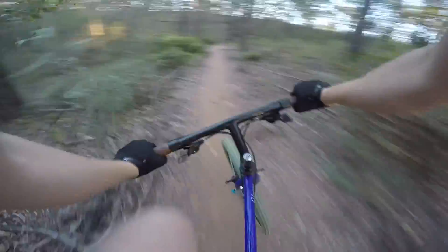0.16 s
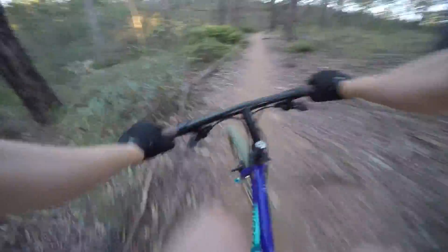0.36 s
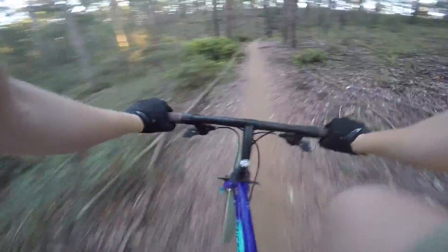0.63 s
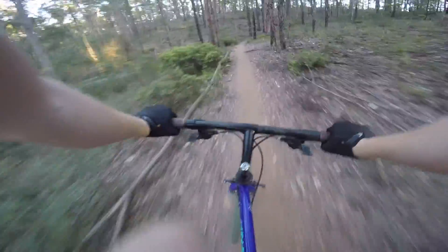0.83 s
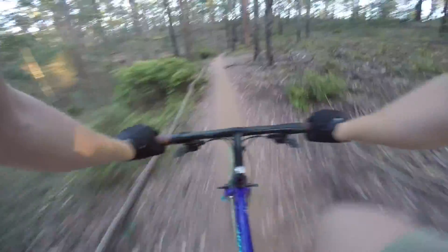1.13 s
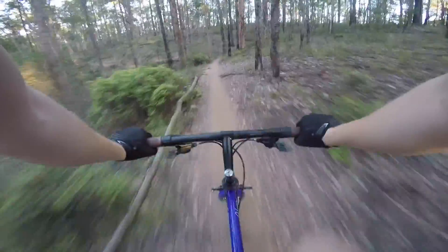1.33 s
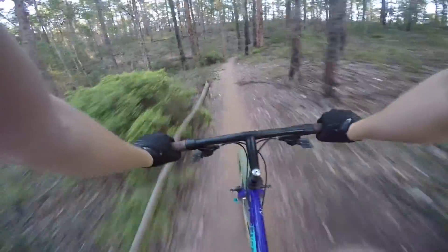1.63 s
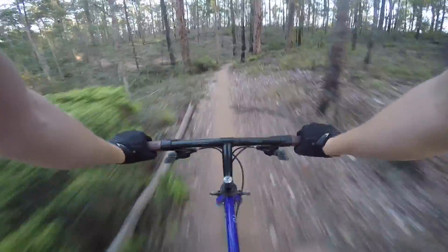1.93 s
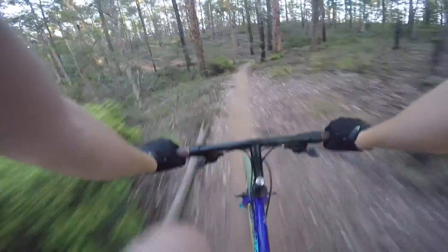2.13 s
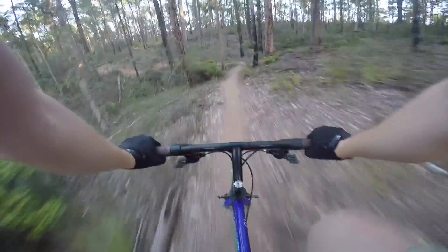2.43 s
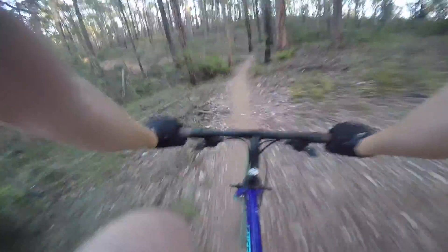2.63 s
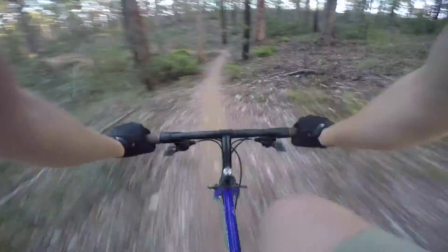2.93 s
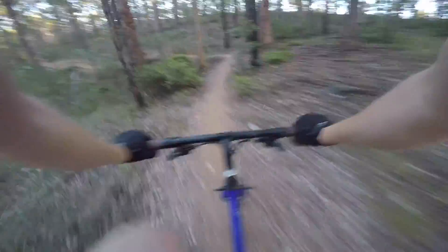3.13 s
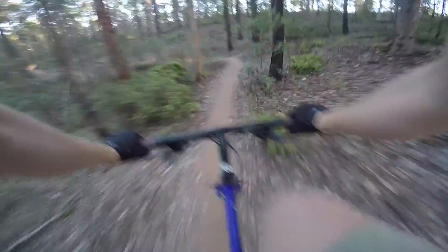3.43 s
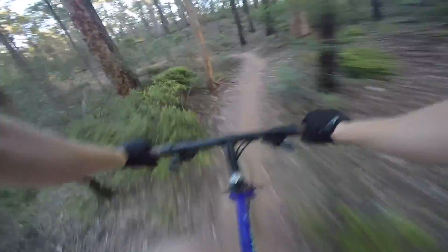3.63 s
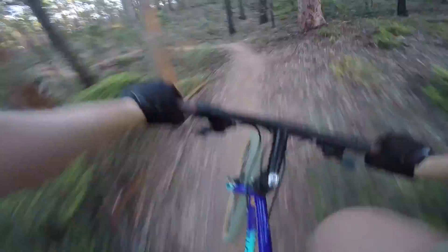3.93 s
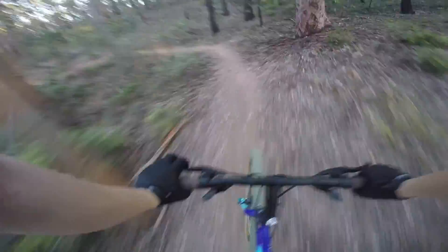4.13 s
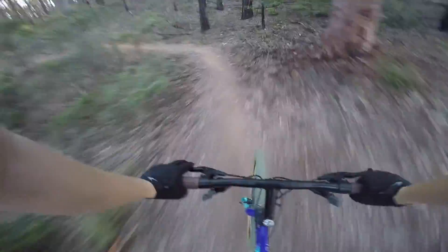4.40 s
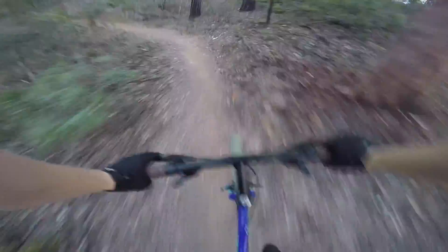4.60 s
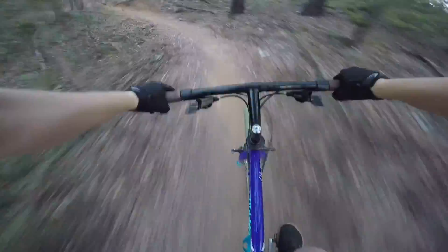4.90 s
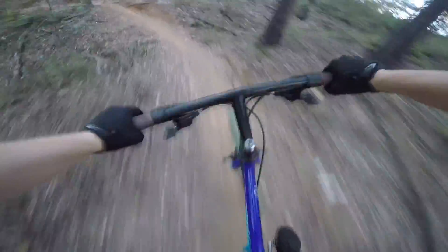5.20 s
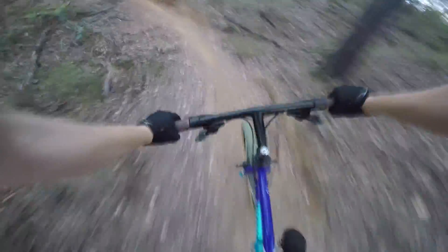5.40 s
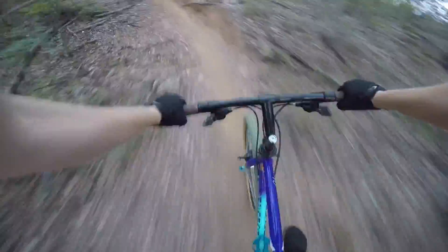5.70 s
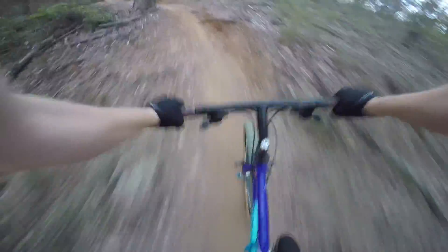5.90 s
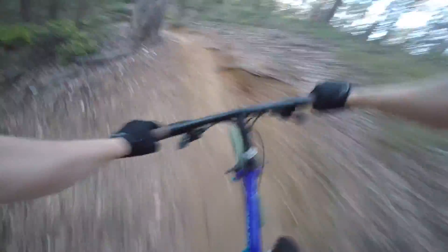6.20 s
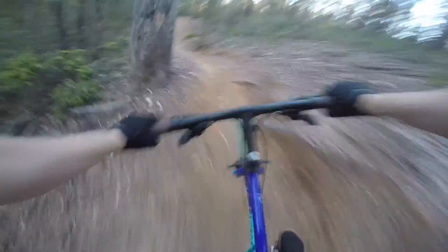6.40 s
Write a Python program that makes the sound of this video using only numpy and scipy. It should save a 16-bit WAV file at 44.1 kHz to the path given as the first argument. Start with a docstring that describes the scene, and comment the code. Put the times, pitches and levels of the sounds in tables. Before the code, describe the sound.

Close on the rider's chest, a cased camera hears knobby tyres crunch over a dry forest trail. Stones click and snap against a low, shaking rumble and a regular soft thump like a racing heartbeat. Hollow mount knocks begin after a second, chain links tick, and the crunch grows heavier past halfway. Near the end a hard hit makes metal ring briefly. Faint hiss and a thin high whine persist.

```python
"""A mountain bike runs fast down a dirt and gravel trail, heard from a cased camera on the rider's chest.
From the start filtered impulses crunch as gravel, decaying sines and noise flick as stones and tick as
chain, and wandering low tones rumble under an even thump of short pulses, likely a racing heartbeat.
After a second the camera mount begins to knock, as damped modes; past halfway the crunch grows heavier.
Near the end one hard hit sets a metal part ringing in many modes. Hiss and a thin whine run throughout."""
import sys
import numpy as np
from scipy import signal
from scipy.fft import rfft, irfft
from scipy.io import wavfile
from scipy.ndimage import map_coordinates

SR = 44100
rng = np.random.default_rng(int(sys.argv[2]) if len(sys.argv) > 2 else 0)


def master(y):
    """Save y as 16-bit WAV."""
    cut = np.clip(np.atleast_2d(y).T, -1, 1)
    pcm = np.round(cut * 32767)  # scale
    wavfile.write(sys.argv[1], SR, pcm.astype(np.int16))


N = 288846
T = np.arange(N) / SR


def undb(db):
    """Level in decibels to amplitude ratio."""
    return 10 ** (np.asarray(db) / 20)


def unit(x):
    """Normalisation to an rms of one."""
    return x / np.sqrt(np.mean(x ** 2))


def crest(x):
    """Normalisation to a peak of one."""
    return x / np.abs(x).max()


def curves(table):
    """Linear interpolation: each column of a table as a line through time."""
    s, *columns = np.transpose(table)
    return [np.interp(T, s, c) for c in columns]


def add(track, s, sound):
    """Superposition: mix a sound into a track at time s."""
    i = max(int(s * SR), 0)
    track[i:i + len(sound)] += sound[:max(N - i, 0)]


def colour(x, points, peaks=(), size=32768):
    """Minimum-phase filtering by a smooth spectrum plus resonances."""
    f = np.maximum(np.fft.rfftfreq(size, 1 / SR), 1)
    hz, db = np.transpose(points)
    db = np.interp(np.log(f), np.log(hz), db)
    for centre, width, height in peaks:
        db = db + height / (1 + (2 * (f - centre) / width) ** 4)
    # folding the cepstrum onto positive time makes the response causal
    cepstrum = irfft(np.log(undb(db)))
    cepstrum[1:size // 2] *= 2
    cepstrum[size // 2 + 1:] = 0
    response = irfft(np.exp(rfft(cepstrum)))
    return signal.fftconvolve(x, response)[:len(x)]


def noise(points, peaks=()):
    """Spectral shaping: coloured noise of rms one."""
    return unit(colour(rng.standard_normal(N), points, peaks))


def walk(rate):
    """Random modulation: lines joining `rate` random values a second, with an rms of one."""
    steps = rng.standard_normal(N // 20)
    return unit(map_coordinates(steps, [T * rate], order=1, mode="wrap"))


def fade(t60, size=8192):
    """Exponential decay by 60 dB in t60 seconds."""
    return np.exp(-np.log(1000) * T[:size] / max(t60, 1e-4))


def ring(hz, t60, size=8192):
    """Damped vibration of one struck mode."""
    return fade(t60, size) * np.sin(2 * np.pi * hz * T[:size])


def burst(t60, size=8192):
    """Broadband contact: an exponentially dying puff of noise."""
    return fade(t60, size) * rng.standard_normal(size)


def swell(s, length):
    """Gaussian envelope: a smooth rise and fall around time s."""
    return np.exp(-((T - s) / length) ** 2)


# spectrum of the hiss: (frequency [Hz], relative level [dB])
HISS_SPECTRUM = [(200, 0), (3000, -2.5), (8000, -10.5), (13000, -13.5), (16000, -17)]
WHINE_HZ = 12617.4


def electronics():
    """Stationary noise and pure tone: faint hiss, a steady whine and a blurred tone an octave below."""
    hiss = undb(-65.5) * noise(HISS_SPECTRUM)
    whine = undb(-71.5) * unit(np.sin(2 * np.pi * WHINE_HZ * T))
    blurred = undb(-74.0) * unit(walk(70) * np.sin(np.pi * WHINE_HZ * T))
    return hiss + whine + blurred


# roughness of the ride, which drives sway, buffeting and tread hum: (time [s], gain [dB])
RIDE_ROUGHNESS = [(0, 0), (.6, -5), (2.4, -4), (2.9, 0), (3.9, -2.5), (4.2, -3.5), (5.1, 1.5), (5.9, 3),
                  (6.55, 1)]
# bumps that swing the camera: (time [s], sway level [dB], air level [dB], time to fall to 1/e [s])
BUMP_SWELLS = [(0.129, -14.5, -54, 0.026), (.21, -13.5, -51, 0.043), (0.486, -13.5, -49, 0.022),
               (0.83, -22, -58, 0.049), (1.137, -21, -46, .035), (2.692, -11.5, -40, 0.048),
               (2.921, -11.5, -49, 0.082), (3.079, -20.5, -50, 0.039), (3.255, -13, -53, 0.039),
               (3.437, -18, -34, 0.014), (3.548, -19.5, -31.5, 0.024), (3.825, -12, -25.5, 0.037),
               (4.017, -17, -36, 0.051), (4.117, -47, -31, 0.046), (4.418, -19, -38.5, 0.043),
               (4.63, -17, -42, 0.052), (4.781, -18.5, -29, 0.03), (4.902, -15.5, -36, 0.053),
               (5.033, -14.5, -42, 0.058), (5.233, -17, -53, 0.027), (5.383, -14.5, -40, 0.064),
               (5.548, -16.5, -42, 0.067), (5.713, -18, -43, 0.099), (5.834, -18.5, -53, 0.023),
               (5.964, -10, -25.5, 0.039), (6.158, -13, -38, 0.083), (6.282, -11.5, -25, 0.027),
               (6.534, -16.5, -33, 0.1)]
# spectrum of the irregular jiggle: (frequency [Hz], relative level [dB])
SWAY_SPECTRUM = [(4, -25.5), (12, 2.5), (18, -1.5), (23, -6), (32, -4), (50, -7.5), (90, -32), (300, -84),
                 (2000, -130)]
# spectrum of the air on the case: (frequency [Hz], relative level [dB])
BUFFET_SPECTRUM = [(15, -4.5), (40, -3.5), (70, -1), (110, -12.5), (170, -19.5), (260, -35.5), (1500, -80),
                   (6000, -110)]
SWAY_DB, BUFFET_DB = -25.5, -39  # before the gain of the ride
SWAY_WANDER_DB = 2
SWAY_HZ, SWAY_DRIFT_OCTAVES = 20.7, 0.32  # centre and wander of the swing
SWAY_FLUTTER = 0.44  # amplitude of the jiggle re the swing


def rumble():
    """Frequency-modulated swing of the camera on its harness, with air buffeting; bumps swell both."""
    ride = undb(curves(RIDE_ROUGHNESS)[0])
    steady_sway = undb(SWAY_DB + SWAY_WANDER_DB * walk(8)) * ride
    bump_sway = sum(undb(db) * swell(s, length) for s, db, _, length in BUMP_SWELLS)
    bump_air = sum(undb(db) * swell(s, length) for s, _, db, length in BUMP_SWELLS)
    sway_size = np.hypot(steady_sway, bump_sway)
    air_size = np.hypot(undb(BUFFET_DB) * ride, bump_air)
    swing_hz = SWAY_HZ * 2 ** (SWAY_DRIFT_OCTAVES * walk(25))
    swing = np.sin(2 * np.pi * np.cumsum(swing_hz) / SR)
    sway = unit(unit(swing) + SWAY_FLUTTER * noise(SWAY_SPECTRUM))
    buffet = noise(BUFFET_SPECTRUM) * unit(undb(3.6 * walk(20)))
    return sway * sway_size + buffet * air_size


# thumps passed on by the chest strap: (time [s], relative level [dB], pitch [Hz])
HEARTBEATS = [(0.289, -11, 51), (0.6258, -12, 42.4), (0.957, -15, 44.8), (1.2938, -12.5, 51.6),
              (1.6283, -13.5, 50), (1.9678, -13.5, 52.6), (2.302, -16, 49), (2.634, -15, 48.6),
              (2.9659, -15.5, 40.4), (3.2985, -15.5, 53), (3.6328, -14, 52), (3.9635, -17.5, 50.7),
              (4.2905, -13.5, 51), (4.6228, -8.5, 47), (4.951, -15, 54.3), (5.2845, -6.5, 37.7),
              (5.6079, -10.5, 47.3), (5.9358, -20.5, 56)]
SECOND_BEAT_S, SECOND_BEAT_DB, SECOND_BEAT_HZ = 0.1686, -21, 27  # the softer, deeper half of each beat
SHUDDER_DB, SHUDDER_HZ, SHUDDER_T60_S = -13.5, 71.4, 0.25  # the harness; level re the beat, mean-range pitch


def heartbeat():
    """Transmission by the chest strap: a dip between two swells, a harness shudder, a softer second beat."""
    out = np.zeros(N)
    lead = .1  # seconds before the centre of a pulse
    t = T[:8192] - lead

    def pulse(hz, cycles):
        """Wave packet: a cosine under a Gaussian envelope."""
        return np.exp(-(t * hz / cycles) ** 2) * np.cos(2 * np.pi * t * hz)

    for s, db, hz in HEARTBEATS:
        thump = pulse(hz, 0.63) + 0.13 * pulse(hz * 1.57, 0.66) + 0.023 * pulse(hz * 3.47, 1.0)
        add(out, s - lead, -undb(db) * thump)
        shudder = ring(SHUDDER_HZ * rng.uniform(0.86, 1.2), SHUDDER_T60_S) * (1 - fade(0.033))
        add(out, s, undb(db + SHUDDER_DB) * shudder)
        second = pulse(SECOND_BEAT_HZ, 0.71)
        add(out, s - lead + SECOND_BEAT_S, -undb(SECOND_BEAT_DB) * second)
    return out


# knocks of the camera mount:
# (time [s], relative level [dB], thud re the clack [dB], thud pitch [Hz], clack pitch [ratio])
MOUNT_KNOCKS = [(1.09, -36.5, 3, 126, 0.93), (2.039, -40.5, 6.5, 128, 1), (2.419, -46, -7, 120, 0.82),
                (2.68, -22.5, 2.5, 130, 0.99), (2.811, -26, 6, 108, 0.97), (3.171, -38.5, -14, 120, 0.93),
                (3.813, -24, 5.5, 113, 0.99), (3.93, -23.5, 4.5, 108, 1.01), (4.383, -35, -6, 121, 0.99),
                (4.602, -35, 3, 106, 1.02), (4.713, -32, 4.5, 118, 1.006), (5.723, -28, 1.5, 118, 0.95),
                (5.978, -21, 1, 116, 1.004), (6.213, -19.5, 5.5, 112, 0.97), (6.293, -29, 2.5, 110, 1.02),
                (6.436, -30, 6.5, 118, 0.95)]
# modes of the camera mount: (nominal frequency [Hz], relative level [dB], t60 [s])
MOUNT_MODES = [(337, -3, 0.0073), (462, -12.5, 0.034), (669, -13, 0.056), (926, -5, 0.038),
               (1150, -10.5, 0.016), (1338, 6.5, 0.015), (1630, 2, 0.011), (1916, 0, 0.013),
               (2510, 7, 0.0057)]
KNOCK_RISE_S = 0.0079  # t60 of the approach to full contact


def knocks():
    """Modal impact: over a bump the mount hits its stop with a hollow clack, a scuff and a low thud."""
    out = np.zeros(N)
    scuff_spectrum = [(200, 16.0), (500, 6.0), (1500, 20.0), (2600, 19.5), (3200, -4), (9000, -35)]
    for s, db, thud_db, thud_hz, pitch in MOUNT_KNOCKS:
        detune = pitch * (1 + 0.012 * rng.standard_normal(len(MOUNT_MODES)))
        clack = 0
        for k, ((hz, mode_db, t60), ratio) in enumerate(zip(MOUNT_MODES, detune)):
            clack = clack + undb(mode_db) * ring(hz * ratio, t60) * (-1) ** k  # alternating polarity
        scuff = colour(burst(0.05), scuff_spectrum, size=4096)
        knock = crest(clack * (1 - fade(KNOCK_RISE_S))) + .4 * crest(scuff)
        thud = -ring(thud_hz, 0.048) * (1 - fade(0.0064))
        add(out, s, undb(db + 3.0) * (knock + undb(thud_db) * thud))
    return out


# chain ticks: (time [s], relative level [dB], t60 [s])
CHAIN_TICKS = [(0.158, -44.5, 0.043), (0.401, -51, .03), (2.592, -48.5, .03), (3.448, -36.5, 0.045),
               (3.983, -45, .04), (3.99, -45, 0.046), (4.644, -43.5, 0.094), (4.947, -45.5, .02),
               (5.093, -49, .03), (5.2776, -39, 0.029), (5.291, -43, .03), (5.303, -42.5, 0.052),
               (5.34, -46, 0.048), (5.45, -44.5, 0.019), (5.468, -39.5, 0.026), (5.483, -44, 0.025),
               (5.543, -47, .025), (5.7284, -40.5, 0.021), (5.866, -47, .025), (6.0738, -33, 0.016),
               (6.23, -47, .04), (6.528, -38, 0.035)]
# spectrum of the slapping links: (frequency [Hz], relative level [dB])
LINK_SPECTRUM = [(1500, -42), (4000, -2), (6500, -0.5), (8000, -7.5), (11000, -12.5), (15000, -14)]
# resonances of the links: (nominal frequency [Hz], width [Hz], nominal height [dB])
LINK_RESONANCES = [(5650, 90, 6), (6730, 90, 11), (7250, 80, 5), (7700, 110, 8), (8080, 140, 6),
                   (8950, 400, 6), (12400, 500, 3), (14500, 400, -6)]
LINK_DETUNE, LINK_SPIKY_DB = 0.024, 2  # spread of pitch as a ratio; unevenness of the chatter


def chain():
    """Resonant filtering of contact noise: links tick brightly, each with a ring of its own."""
    out = np.zeros(N)
    for s, db, t60 in CHAIN_TICKS:
        chatter = undb(LINK_SPIKY_DB * rng.standard_normal(8192))
        slap = burst(t60) * (1 - fade(t60 / 4)) * chatter
        modes = []
        for hz, width, height in LINK_RESONANCES:
            link_hz = hz * (1 + LINK_DETUNE * rng.standard_normal())
            modes.append((link_hz, width, height * rng.uniform(.2, 1.4)))
        add(out, s, crest(colour(slap, LINK_SPECTRUM, modes, size=4096)) * undb(db + 5.0))
    return out


# hard hit on metal: (time [s], relative level [dB])
METAL_HITS = [(5.955, -10)]
# modes of the struck metal: (frequency [Hz], relative level [dB], t60 [s])
METAL_MODES = [(2268, -7, .5), (2286, -14, .25), (3591, -17, .33), (3720, -20, .28), (4102, -22, .4),
               (4646, -12, .13), (4705, 2, .06), (5334, -13, .08), (5701, -2.5, .26), (5728, -12, .17),
               (5800, -17, .2), (5975, -9, .07), (6070, -14, .17), (6567, -3, .13), (6798, -8, .07),
               (7560, -17, .08), (8450, -12, .05), (8950, -12, .06), (9650, -14, .05), (10440, -15, .05),
               (10620, -15, .04), (11300, -18, .04), (11880, -20, .05), (13100, -25, .04)]
METAL_BUZZ_DB = 2.5  # the ring trembles as it dies


def clang():
    """Modal synthesis: a brief clatter of contact, then the metal rings on."""
    out = np.zeros(N)
    crash_spectrum = [(2000, -11), (4500, 3), (5300, -2), (6800, 0), (7800, -7), (11000, -8),
                      (13000, -15), (15500, -24)]
    for s, db in METAL_HITS:
        modes = sum(undb(mode_db) * ring(hz, t60, size=32768) for hz, mode_db, t60 in METAL_MODES)
        clatter = burst(0.023) * (1 - fade(0.011))
        crash = colour(clatter, crash_spectrum, size=4096)
        tremble = undb(METAL_BUZZ_DB * walk(160)[:len(modes)])
        add(out, s, undb(db - 4) * crest(crash))
        add(out, s + .002, undb(db - 14.5) * modes * tremble)
    return out


# resonances of the camera case: (frequency [Hz], width [Hz], height [dB])
CASE_RESONANCES = [(350, 53, 7.5), (680, 18, 2), (1008, 40, 5.5), (1258, 182, 7.5), (1464, 90, -7.5),
                   (1701, 497, 8), (2360, 26, 3), (3203, 750, 5), (3130, 110, 3.5), (3320, 293, -5),
                   (3603, 92, 4), (4147, 100, 5.5), (4640, 390, 2), (4890, 280, -3.5), (5080, 150, -14),
                   (5780, 450, -3.5), (6770, 430, 3.5)]
STONE_T60_S, STONE_DIRT_DB = 0.0093, -3  # ring of a stone; dirt burst re the ring
STONE_RISE_S = 0.0015  # t60 of the approach to full contact


def stone(hz, bright_db):
    """Impact of a small body: a short pitched click, a crack and a scatter of dirt, with little low end."""
    click = ring(hz, STONE_T60_S) - 0.5 * ring(hz * 1.32, 0.01) + 0.66 * ring(hz * 1.666, 0.0077)
    snap = click + 0.95 * burst(0.014) + undb(STONE_DIRT_DB) * burst(0.037)
    tone = [(300, -31), (min(hz * 0.62, 1900), -13), (min(hz * 0.63, 3000), -5), (3600, bright_db / 2),
            (6000, bright_db - 12.5), (9000, bright_db - 27.5), (15000, bright_db - 51)]
    return crest(colour(snap * (1 - fade(STONE_RISE_S)), tone, CASE_RESONANCES, size=4096))


# how hard the tyres bite into the gravel: (time [s], relative crunch level [dB])
TRAIL_BITE = [(0.03, -45.5), (.13, -46.5), (.22, -50.5), (.36, -46), (.55, -43), (.68, -45.5), (.77, -47),
              (.86, -45), (1.0, -44.5), (1.07, -45.5), (1.15, -45.5), (1.3, -43.5), (1.5, -46), (1.68, -46),
              (1.95, -47), (2.25, -49), (2.42, -49), (2.56, -49.5), (2.72, -44), (2.95, -41), (3.04, -43),
              (3.17, -39), (3.33, -39.5), (3.6, -38.5), (3.72, -40.5), (3.85, -34.5), (3.91, -36.5),
              (3.97, -38), (4.04, -44.5), (4.12, -46), (4.29, -45.5), (4.35, -40.5), (4.43, -46.5),
              (4.69, -46.5), (4.8, -38), (4.9, -42), (5.04, -34.5), (5.25, -37), (5.43, -44.5),
              (5.55, -36.5), (5.66, -33.5), (5.82, -29.5), (5.89, -34), (5.94, -29.5), (6.04, -35.5),
              (6.12, -33.5), (6.28, -34), (6.42, -40.5), (6.495, -55), (6.515, -38.5)]
PEBBLES_PER_S, PEBBLE_DB, PEBBLE_SCATTER_DB = 11, 8, -1  # mean rate; peak re the bite curve; its spread
PEBBLE_HZ, PEBBLE_BRIGHT_DB = (1750, 2320), 1.5  # pitch range; middle brightness


def pebbles(count=200):
    """Random point process: small stones fly at uneven moments, louder where the tyres bite harder."""
    out = np.zeros(N)
    times = np.cumsum(rng.uniform(.1, 1.9, count)) / PEBBLES_PER_S
    pitches = rng.uniform(*PEBBLE_HZ, count)
    variations = rng.standard_normal((count, 2))
    for s, hz, (scatter, tint) in zip(times, pitches, variations):
        if s < T[-1]:
            bite_db = np.interp(s, *np.transpose(TRAIL_BITE))
            db = bite_db + PEBBLE_DB + PEBBLE_SCATTER_DB * min(scatter, 1.5)
            add(out, s, stone(hz, PEBBLE_BRIGHT_DB + 4 * min(tint, 1)) * undb(db))
    return out


# larger stones flicked by the tyres: (time [s], relative level [dB], pitch [Hz], brightness [dB])
FLICKED_STONES = [(0.263, -36, 1840, -3), (0.299, -36.5, 3200, 4), (0.363, -38, 2560, -8),
                  (0.404, -36, 2980, -19), (0.462, -34.5, 1770, -12), (0.5, -36, 1700, -7),
                  (0.519, -35, 1800, -16), (0.5577, -29.5, 1740, -15), (0.579, -31.5, 1680, -14),
                  (0.622, -31, 1920, 4), (0.661, -38, 1770, -6), (0.6929, -32, 1880, -4),
                  (0.709, -29, 1800, -2), (0.832, -30.5, 1820, 4), (0.886, -33, 1740, -6),
                  (0.968, -30, 1920, 2), (1.002, -28, 1830, 3), (1.02, -24, 1880, -3.5),
                  (1.1018, -25, 1660, 4), (1.2155, -25, 1810, -12), (1.2226, -26, 1850, -11),
                  (1.3007, -32.5, 1840, 12), (1.3952, -31, 3200, -20), (1.619, -37.5, 1800, -4),
                  (1.707, -32, 1730, 10), (1.728, -32, 1750, -6), (1.76, -25.5, 2340, -4),
                  (1.803, -32, 3040, -18), (1.852, -37, 3150, -6), (1.931, -25, 2240, -2),
                  (2.1057, -28, 2850, -13), (2.1137, -32.5, 1770, 4), (2.399, -38, 1790, 4),
                  (2.418, -34, 1695, -9), (2.6564, -23, 2960, -13), (2.691, -30, 1850, 14),
                  (2.721, -28.5, 1730, -24), (2.824, -34, 1790, -29), (2.872, -37, 1870, -1),
                  (2.951, -22.5, 2890, -4), (2.9823, -28.5, 2980, -16), (3.07, -35, 3300, 25),
                  (3.09, -31.5, 1670, -4), (3.1913, -30, 1750, -10), (3.265, -24, 1800, -5),
                  (3.335, -29, 2400, -11), (3.4098, -26.5, 1700, -3), (3.4552, -28, 1660, 9),
                  (3.536, -37, 3430, -11), (3.598, -29.5, 1670, -10), (3.676, -28.5, 1750, -3),
                  (3.699, -30, 3040, 6), (3.753, -23.5, 2690, -5), (3.795, -34, 1850, -19),
                  (3.8555, -22, 1920, -14), (3.957, -32, 1700, -15), (4.013, -27.5, 2010, -4),
                  (4.076, -32, 1910, 7), (4.093, -30, 1770, -7), (4.178, -39, 3500, -3),
                  (4.357, -32, 1530, 19), (4.368, -29, 1620, -8), (4.3836, -20, 2000, -11),
                  (4.496, -33.5, 2650, -5), (4.502, -28.5, 1950, -5), (4.574, -31, 1900, 0),
                  (4.659, -29.5, 1920, 4), (4.733, -28, 1620, -3), (4.7445, -34, 1830, -9),
                  (4.947, -26, 1880, 0), (4.9678, -24, 1670, -27), (5.021, -23, 1660, -2),
                  (5.039, -25, 1800, 1), (5.094, -24, 1810, 7), (5.127, -22, 1700, 4),
                  (5.162, -28.5, 1820, 11), (5.4117, -29.5, 1710, -3), (5.5162, -26.5, 2000, -14),
                  (5.6101, -24, 1940, -13), (5.627, -27, 1820, -10), (5.66, -26, 1620, -8),
                  (5.67, -25.5, 1870, -19), (5.7341, -28, 1780, -8), (5.801, -18, 1780, -15),
                  (5.809, -19.5, 1390, -14), (5.927, -22, 1780, -9), (6.0766, -15, 2030, -14),
                  (6.084, -26, 3100, -13), (6.111, -22.5, 1780, -9), (6.1271, -21.5, 1650, -16),
                  (6.17, -30.5, 3040, -4), (6.237, -26, 2170, 2), (6.278, -26, 2240, -17),
                  (6.416, -38, 2050, 10), (6.509, -38, 1720, -16.5)]


def stones():
    """Superposed impacts: the larger stones, one by one."""
    out = np.zeros(N)
    for s, db, hz, bright_db in FLICKED_STONES:
        add(out, s, stone(hz, bright_db) * undb(db + 2))
    return out


def grains(rate, spread_db, size=120000):
    """Poisson process of tiny fractures at random moments: most are faint, a few stand out."""
    at = (np.cumsum(rng.exponential(size=size)) * SR / rate).astype(int)
    strength = undb(spread_db * np.minimum(rng.exponential(size=size), 4))
    strength = strength * rng.choice([-1, 1], size)
    return np.bincount(at[at < N], strength[at < N], N)


# sideways slips of a tyre:
# (time [s], relative level [dB], pitch [Hz], time to fall to 1/e [s], glide [octaves/s])
TYRE_SLIPS = [(0.09, -55, 1080, 0.068, 0), (3.875, -50, 1000, 0.03, -4), (3.978, -48, 800, 0.028, -22.5)]
SLIP_WIDTH_HZ = 166  # low-pass corner, the half width of the rasp about its pitch


def slips():
    """Amplitude modulation: grains rasp dully about a carrier as a tyre slides; some slips sink in pitch."""
    out = 0
    lowpass = signal.butter(2, SLIP_WIDTH_HZ, fs=SR, output="sos")
    for s, db, hz, length, glide in TYRE_SLIPS:
        rasp = signal.sosfilt(lowpass, grains(rate=3000, spread_db=5))
        pitch = hz * 2 ** (glide * np.clip(T - s, -2 * length, 2 * length))
        carrier = np.sin(2 * np.pi * np.cumsum(pitch) / SR)
        out = out + unit(rasp * carrier) * undb(db) * swell(s, length)
    return out


SCRAPE_DB, PATCHY_DB = -7.5, 1.5  # soft sliding dirt re the grains; each grain size comes and goes


def gravel(rate, spread_db):
    """Band-pass resonance: grains of several sizes snap in patches, with soft dirt sliding between."""
    out = 0
    for hz in np.geomspace(700, 6000, 10):
        band = signal.butter(1, [hz / 1.11, hz * 1.11], "band", fs=SR)
        snaps = unit(grains(rate, spread_db, size=20000))
        contact = snaps + undb(SCRAPE_DB) * rng.standard_normal(N)
        out = out + signal.lfilter(*band, contact * undb(PATCHY_DB * walk(70)))
    return out


# weight on the tyres, which deepens the crunch: (time [s], deep crunch re the light [dB])
TYRE_LOAD = [(0, -1), (.55, -1), (1.15, -4.5), (1.8, -13), (2.5, -6), (3.2, -2.5), (3.6, -11.5), (3.92, 5),
             (4.3, -3.5), (4.8, 3.5), (5.2, -0.5), (5.7, 10.5), (6.1, -3), (6.5, 0)]
# spectrum of the light crunch: (frequency [Hz], relative level [dB])
CRUNCH_SPECTRUM = [(150, -22), (500, -33), (850, -15), (1200, -5), (1800, -1), (2500, 1), (3400, 2.5),
                   (4300, -5), (5500, -12.5), (8000, -46), (16000, -63)]
# spectrum of the deep, coarse crunch: (frequency [Hz], relative level [dB])
COARSE_SPECTRUM = [(150, -33), (500, -31), (850, -7.5), (1200, -7.5), (1650, 1.5), (2050, 3), (2500, -1),
                   (3500, -13.5), (6000, -15), (16000, -81)]
# spectrum of the fine grit: (frequency [Hz], relative level [dB])
GRIT_SPECTRUM = [(1500, -41), (4000, 2.5), (5500, 5), (7000, 0), (8200, -8), (10000, -12), (13000, -16),
                 (15500, -17)]
# spectrum of the tread hum: (frequency [Hz], relative level [dB])
TREAD_SPECTRUM = [(60, -33), (180, 1.5), (280, -5.5), (450, -5.5), (800, -9.5), (1500, -15.5),
                  (5000, -38.5)]
GRIT_DB, GRIT_PER_CRUNCH = -19.5, 1  # spray re the mean bite; dB per dB of bite
DUST_DB = -68  # floor of the spray before clumping
TREAD_DB, TREAD_PER_CRUNCH = -57, 0.35  # before ride, bite and clumping; dB per dB of bite


def tyres():
    """Granular fracture: knobs crush gravel in uneven clumps, fine grit sprays and the tread hums below."""
    crunch_db, = curves(TRAIL_BITE)
    load_db, = curves(TYRE_LOAD)
    ride_db, = curves(RIDE_ROUGHNESS)
    mean_db = crunch_db.mean()
    excess_db = crunch_db - mean_db
    clumps = unit(undb(1.4 * walk(45) + 1.68 * walk(200)))
    light = unit(colour(gravel(rate=260, spread_db=3.0), CRUNCH_SPECTRUM, CASE_RESONANCES))
    # a loaded tyre digs into coarser gravel, which sounds lower
    coarse = unit(colour(gravel(rate=600, spread_db=4.5), COARSE_SPECTRUM, CASE_RESONANCES))
    deep = coarse * undb(load_db)
    crunch = (light + deep) / np.hypot(1, undb(load_db)) * undb(crunch_db - 3.5)
    spray = np.hypot(undb(DUST_DB), undb(GRIT_DB + mean_db + GRIT_PER_CRUNCH * excess_db))
    grit = unit(colour(grains(rate=12000, spread_db=5.0), GRIT_SPECTRUM, CASE_RESONANCES)) * spray
    tread_size = undb(TREAD_DB + ride_db + TREAD_PER_CRUNCH * excess_db)
    tread = noise(TREAD_SPECTRUM, CASE_RESONANCES) * tread_size
    return clumps * (crunch + grit + tread)


def scene():
    """Linear superposition of every source at the one microphone."""
    ground = tyres() + slips() + stones() + pebbles()
    hardware = knocks() + chain() + clang()
    background = heartbeat() + rumble() + electronics()
    return (ground + hardware + background)[None]


TOP_HZ = 15300


def record(dry):
    """Low-pass filtering: the camera cuts the top with a steep elliptic slope."""
    lowpass = signal.ellip(8, .2, 80, TOP_HZ, fs=SR, output="sos")
    return signal.sosfilt(lowpass, dry)


dry = scene()
out = record(dry)
master(out)
```